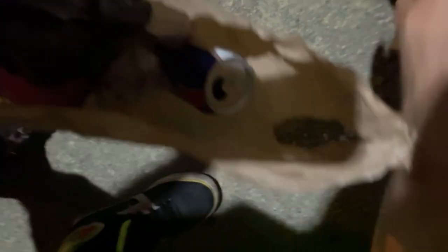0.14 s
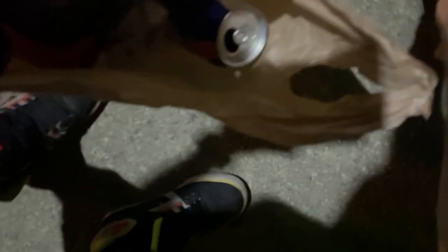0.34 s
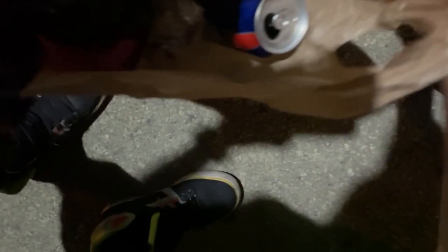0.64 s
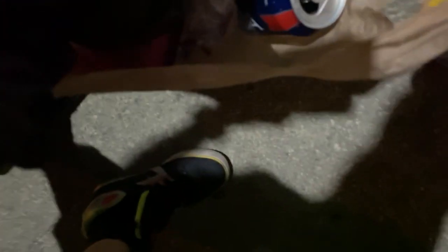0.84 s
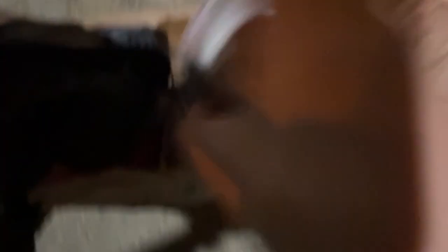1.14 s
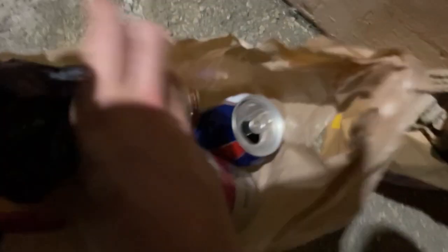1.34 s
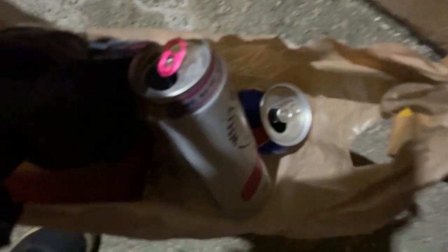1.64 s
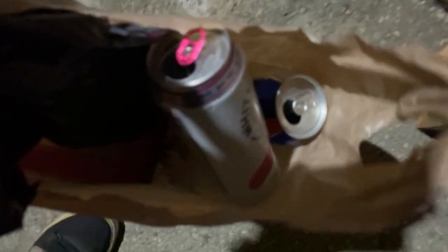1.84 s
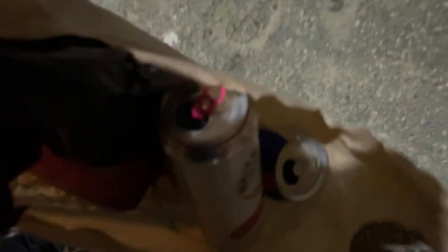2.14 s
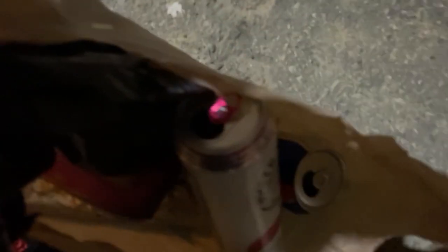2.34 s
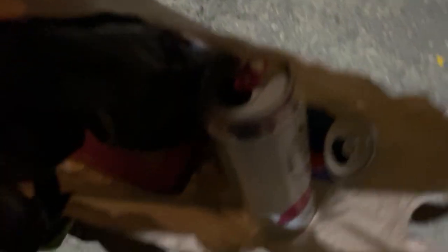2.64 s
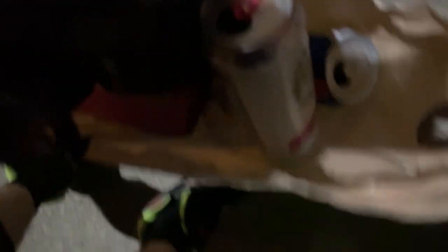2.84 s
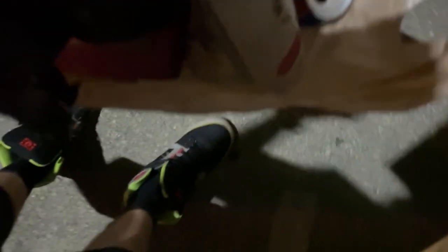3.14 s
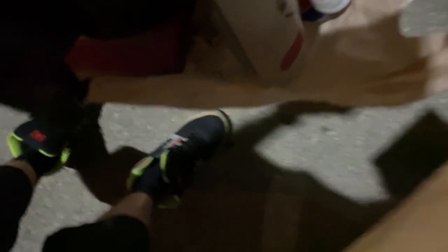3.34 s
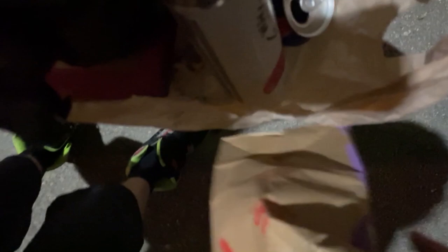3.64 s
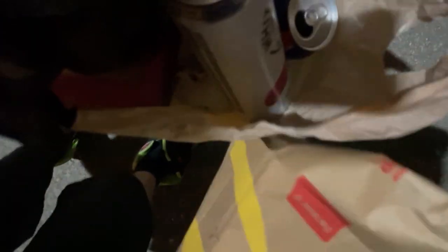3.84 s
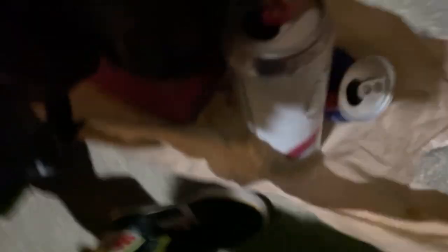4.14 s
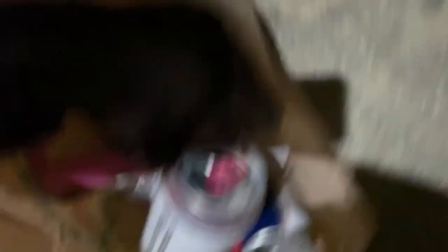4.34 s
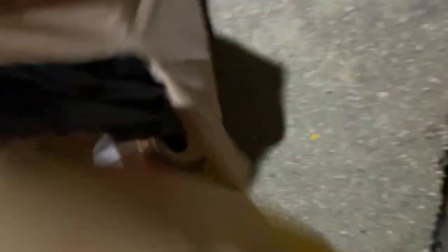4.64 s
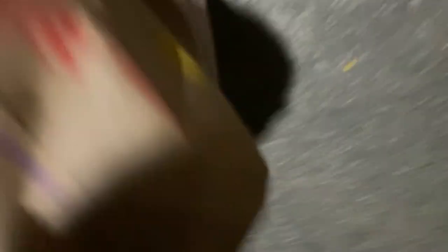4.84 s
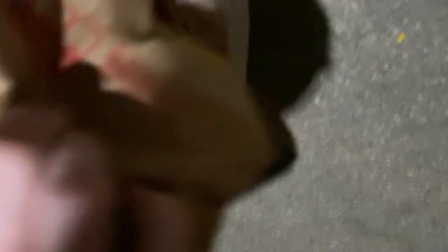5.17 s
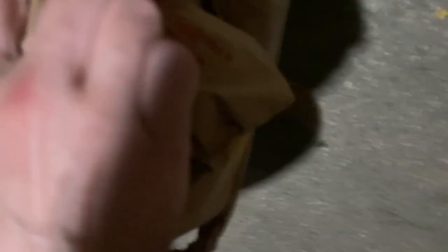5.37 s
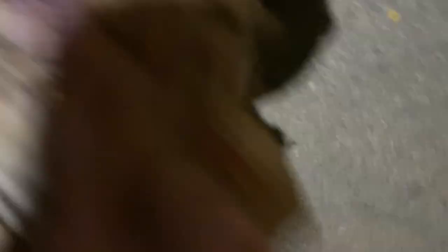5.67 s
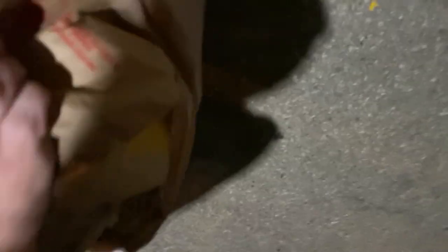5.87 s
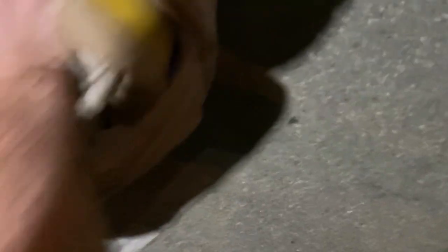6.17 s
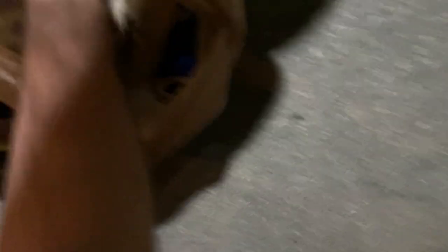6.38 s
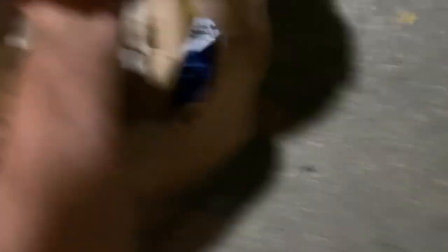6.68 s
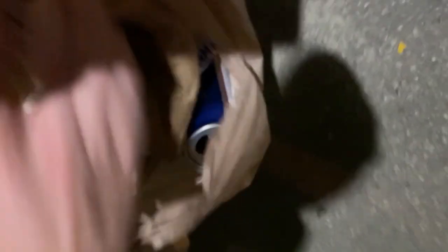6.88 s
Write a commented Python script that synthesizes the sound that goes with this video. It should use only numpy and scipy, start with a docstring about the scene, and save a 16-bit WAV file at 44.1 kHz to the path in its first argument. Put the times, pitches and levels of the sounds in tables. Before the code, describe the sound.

Empty drink cans clink in a paper bag outdoors, then the bag is swung and gathered up with loud crackling, over low wind rumble.

```python
"""Outdoors at night, a paper bag of empty drink cans held close to the microphone, for seven seconds.
One can taps another, ringing in decaying sines; a further can drops in, with a scratchy noise contact.
The grip shifts, the bag sags, sways and is swung round, its cans knocking as short hollow noise bursts.
Last it is gathered up: crackle from tiny random creases swells and stiff folds snap as noise bursts.
Throughout, a low rumble of wind and a wash of far traffic, both filtered noise, lie underneath."""
import sys
import numpy as np
from scipy import signal
from scipy.fft import rfft, irfft
from scipy.io import wavfile
from scipy.ndimage import uniform_filter1d

SR = 44100
rng = np.random.default_rng(int(sys.argv[2]) if len(sys.argv) > 2 else 0)


def unload_audio(sound):
    """Save the sound as a 16-bit wav file, at the path given as the first command line argument."""
    columns = np.transpose(np.atleast_2d(sound))
    # keep every value between -1 and 1, then stretch to whole-number steps
    steps = np.round(np.clip(columns, -1, 1) * 32767)
    wavfile.write(sys.argv[1], SR, steps.astype(np.int16))


N = 309141  # samples


def amp(db):
    """Decibels to gain."""
    return 10 ** (np.asarray(db) / 20)


def evened(x):
    """Scales to rms 1."""
    return x / np.sqrt(np.mean(x ** 2) + 1e-20)


def steadied(x, seconds):
    """Holds the running rms at 1, leaving faster detail alone."""
    window = max(3, int(seconds * SR))
    return x / np.sqrt(abs(uniform_filter1d(x ** 2, window)) + 1e-12)


def curve(rows, axis=1):
    """One column of a time table, interpolated at every sample."""
    rows = np.asarray(rows)
    return np.interp(np.arange(N) / SR, rows[:, 0], rows[:, axis])


def coloured(x, points):
    """Filters x by (frequency [Hz], level [dB]) points, falling away beyond both ends, to rms 1."""
    hz, db = np.transpose(points)
    f = np.fft.rfftfreq(len(x), 1 / SR) + 1  # the 1 Hz offset avoids log(0)
    gain = amp(np.interp(np.log(f), np.log(hz), db))
    ends = np.minimum(np.minimum(f / hz[0], hz[-1] / f), 1) ** 2
    return evened(irfft(rfft(x) * gain * ends, len(x)))


def add(mix, s, sound):
    """Mixes a sound in at s seconds, cut off at the end of the mix."""
    part = mix[max(0, round(s * SR)):][:len(sound)]
    part += sound[:len(part)]


def resonate(x, hz, width_hz):
    """A resonance whose centre may follow a curve: shift down to 0 Hz, smooth, shift back up."""
    turn = np.exp(2j * np.pi * np.cumsum(hz * np.ones(len(x))) / SR)
    r = np.exp(-np.pi * width_hz / SR)
    return 2 * (turn * signal.lfilter([1 - r], [1, -r], x / turn)).real


def burst(colour, t60, rise, grit_db=2.0, size=8192):
    """A crowd of overlapping modes, struck by a quick stutter of slips; the treble dies first."""
    t = np.arange(size) / SR
    slips = evened(uniform_filter1d(rng.standard_normal(size), size=30))
    stutter = amp(grit_db * slips.clip(-2, 2))
    noise = coloured(rng.standard_normal(size) * stutter, colour)
    low = signal.sosfilt(signal.butter(1, 3000, fs=SR, output="sos"), noise)
    high = noise - low
    fall, onset = amp(-60 * t / t60), 1 - np.exp(-t / rise)
    # both bands outlast the nominal t60, the low one longest
    sound = onset * (low * fall ** 0.69 + high * fall ** 0.89)
    # keep the energy of the plain envelope
    return sound * np.linalg.norm(onset * fall) / np.linalg.norm(sound)


# low rumble of wind and far traffic: (time [s], level [dB], centre of its boom [Hz])
RUMBLE_LEVELS = [(0, -23.5, 63), (.3, -31, 65.6), (.55, -25, 85.8), (1.15, -25, 74.4), (1.45, -35, 75),
                 (1.66, -23.5, 65.2), (2.25, -22.5, 59), (2.85, -28.5, 71.5), (3.02, -24, 80.7),
                 (4.1, -24, 73.4), (4.56, -30, 73), (4.74, -22.5, 65), (5.15, -28, 73.6), (5.5, -41, 72),
                 (5.72, -26.5, 80), (6.3, -32.5, 74), (6.65, -43.5, 77.4), (7, -37.5, 65.5)]
# spectrum of the rumble around the boom: (frequency [Hz], relative level [dB])
RUMBLE_SPECTRUM = [(24, -32), (31, -37), (40, 8.5), (58, 6), (108, 3.5), (155, -13), (210, -15.5),
                   (290, -25)]


def rumble():
    """Lumpy low noise with a boom of resonating noise whose centre wanders."""
    air = coloured(rng.standard_normal(N), RUMBLE_SPECTRUM)
    centre = curve(RUMBLE_LEVELS, axis=2)
    narrow = resonate(rng.standard_normal(N), centre, width_hz=9.9)
    boom = evened(resonate(narrow, centre, width_hz=23))
    return amp(curve(RUMBLE_LEVELS)) * steadied(boom + air, 0.1055)


# street heard from far off: (time [s], level [dB])
STREET_LEVELS = [(0, -48.5), (.65, -51.5), (1.55, -51.5), (1.85, -45.5), (2.65, -47), (3.35, -59),
                 (4.2, -50), (6.35, -50), (6.68, -63), (7, -47)]
# spectrum of the street: (frequency [Hz], relative level [dB])
STREET_SPECTRUM = [(190, 0), (520, -10), (860, -10.5), (1400, -19.5), (2200, -22), (3300, -31.5),
                   (5300, -27.5), (7000, -41), (15500, -61)]


def street():
    """Far traffic, blended by distance into a smooth wash of noise."""
    return coloured(rng.standard_normal(N), STREET_SPECTRUM) * amp(curve(STREET_LEVELS))


def surroundings(x):
    """Short scatter from the pavement and nearby walls, as a decaying noise echo."""
    tail = burst([(150, 5), (1000, -1.5), (5000, -1.0), (16000, -2.5)], t60=0.15, rise=0.0016)
    return signal.oaconvolve(x, tail / np.linalg.norm(tail))[:N]


# the whole bag bumping: (time [s], level [dB])
BAG_BUMPS = [(1.3253, -25.5), (2.521, -27.5), (4.2702, -25.5), (4.3028, -21.5), (4.487, -30), (4.611, -29),
             (4.8863, -23), (5.2234, -21), (5.2658, -30), (6.2867, -30)]
# spectrum of a bump: (frequency [Hz], relative level [dB])
BUMP_SPECTRUM = [(50, -76), (130, 12.5), (280, 11.5), (450, -11), (900, -14), (2500, -13)]


def bumps():
    """The bag itself thuds: dull bursts of noise with a soft onset."""
    out = np.zeros(N)
    for s, db in BAG_BUMPS:
        add(out, s, amp(db) * burst(BUMP_SPECTRUM, t60=0.11, rise=0.004))
    return out


# cans knocking, damped by the paper:
# (time [s], level before a 2 dB cut [dB], pitch [Hz], nominal t60 [s])
CAN_KNOCKS = [(1.3259, -20, 1160, 0.03), (1.326, -28, 646, 0.029), (3.179, -17, 1030, 0.017),
              (3.355, -26, 1040, 0.03), (3.575, -32.5, 1290, 0.1), (4.303, -25, 1010, 0.074),
              (4.4112, -16.5, 1220, 0.033), (4.445, -17.5, 1400, 0.092), (4.452, -32.5, 567, 0.27),
              (4.486, -24, 1770, 0.067), (5.813, -24, 1080, 0.17), (6.04, -23, 1090, 0.055),
              (6.825, -19, 700, 0.023)]


def knocks():
    """Cans pressed in paper only give a short hollow tock, a noise burst peaking at the pitch."""
    out = np.zeros(N)
    for s, db, hz, t60 in CAN_KNOCKS:
        hollow = [(hz / 6, -15), (hz * 0.56, -9), (hz, 0), (hz * 1.27, -3), (hz * 1.58, -17), (hz * 10, -37)]
        add(out, s, amp(db - 2.0) * burst(hollow, t60, rise=0.00035))
    return out


# cans striking: (time [s], ring level [dB], scratchy contact level [dB],
# can [0 = lying in the bag, 1 = dropped in; also scales the waver])
CAN_CLINKS = [(0.435, -47.5, -51, 0.12), (0.5651, -27.5, -36, 0.44), (0.5743, -35.5, -42, 0.39),
              (1.3253, -17.5, -23, 1), (1.3343, -30, -27.5, 1), (1.347, -37, -24, 1), (1.4047, -47, -26, 1),
              (1.4327, -41, -30, 0.9)]
# modes of the can lying in the bag: (frequency [Hz], level relative to the ring [dB], t60 [s])
LYING_CAN_MODES = [(281, -5, 0.17), (1105, -3, 0.12), (1320, -32.5, 0.95), (1670, -16, .09),
                   (2050, -4, 0.023), (3070, -12, 0.2), (3160, -12, 0.13), (3970, -14, 0.069),
                   (4080, -2.5, 0.064), (4270, -15, .06), (4340, -17, 0.11)]
# modes of the can dropped in: (frequency [Hz], level relative to the ring [dB], t60 [s])
DROPPED_CAN_MODES = [(262, -2, 0.12), (300, -8.5, 0.26), (1100, -1.5, 0.15), (1380, -33, 0.12),
                     (1410, -24, 0.13), (1530, -24, 0.27), (2240, -11, 0.069), (2440, -18, 0.097),
                     (2722, -23, 0.3), (2900, -20, 0.13), (3488, -23, 0.22), (4630, -26, 0.43),
                     (4740, -33, .07), (5600, -37, 0.15), (10260, -4.5, 0.054)]
# spectrum of the scratchy contact: (frequency [Hz], relative level [dB])
CONTACT_SPECTRUM = [(100, -12), (400, 3), (1500, 7), (3000, -6.5), (6000, -1.5), (11000, -7), (16000, -12)]


def clinks():
    """Thin aluminium: a scratchy contact, then the wall modes and the air inside the can ring."""
    out = np.zeros(N)
    t = np.arange(SR // 2) / SR
    onset = 1 - np.exp(-t / 0.00016)
    for s, ring_db, contact_db, can in CAN_CLINKS:
        modes = DROPPED_CAN_MODES if can > .5 else LYING_CAN_MODES
        for hz, db, t60 in modes:
            # a can rattling against its neighbours wavers in phase, most in the high modes
            waver = resonate(rng.standard_normal(len(t)), 0, 60) * can * hz / 400
            ring = amp(ring_db + db - 60 * t / t60) * np.sin(2 * np.pi * hz * t + waver)
            add(out, s, ring * onset)
        add(out, s, amp(contact_db) * burst(CONTACT_SPECTRUM, t60=0.048, rise=0.00041))
    return out


# pushes and pulls on the paper: (time [s], length before release [s], crackle level [dB],
# level of the flexing panels [dB], bright over dull crackle [dB])
# The bag is held open; from 1.3 s a can goes in and the hand draws back; from 2.2 s the grip shifts;
# from 2.7 s the bag sags and sways; from 4.25 s it is swung round, and from 4.75 s gathered up.
PAPER_STROKES = [(0.005, 0.041, -37.5, -48, 28), (0.077, 0.31, -60.5, -70, -9), (0.514, .22, -55, -75, 22),
                 (0.77, 0.51, -59.5, -62, -3), (1.023, 0.053, -50, -49.5, -8), (1.301, 0.17, -47, -49, 1),
                 (1.507, 0.13, -47, -54, 21), (2.212, 0.18, -48.5, -46.5, -4), (2.31, 0.26, -40.5, -44, 2),
                 (2.544, 0.15, -48.5, -48, -10), (2.709, 0.76, -62.5, -50, -22),
                 (3.496, 0.6, -60, -46.5, -26), (3.875, 0.048, -41.5, -35.5, -25),
                 (4.257, 0.064, -36, -29, -4), (4.346, .14, -39, -34.5, -2), (4.52, 0.24, -47, -49.5, -2),
                 (4.765, 0.29, -32.5, -34, 1), (5.053, 0.19, -39.5, -38.5, -4),
                 (5.177, 0.13, -31.5, -43, -9), (5.285, 0.17, -34.5, -38, -3), (5.525, 0.48, -40, -41, -8),
                 (5.622, 0.062, -28.5, -33.5, 10), (5.826, 0.22, -32, -37, -6.5),
                 (6.097, 0.22, -36.5, -39, -15), (6.338, 0.19, -45, -42.5, -22),
                 (6.734, 0.064, -54, -38, -25)]
STROKE_ATTACK_S, STROKE_RELEASE_T60_S = 0.029, 0.18
IDLE_CRACKLE_DB, IDLE_PANEL_DB, IDLE_BRIGHT_DB = -67.5, -63, 1  # the held bag is never quite still


def stroke_powers(crackle_db, panel_db, bright_db):
    """Powers of dull crackle, bright crackle and panels, the crackle shared out by its brightness."""
    bright_share = 1 / (1 + amp(-bright_db) ** 2)
    crackle = amp(crackle_db) ** 2
    return np.array([[crackle * (1 - bright_share)], [crackle * bright_share], [amp(panel_db) ** 2]])


def handling():
    """Each stroke swells, holds and dies away; gives gains of dull crackle, bright crackle, panels."""
    t = np.arange(N) / SR
    power = stroke_powers(IDLE_CRACKLE_DB, IDLE_PANEL_DB, IDLE_BRIGHT_DB)
    for start, length, crackle_db, panel_db, bright_db in PAPER_STROKES:
        attack = np.clip((t - start) / STROKE_ATTACK_S, 0, 1)
        release_time = np.clip((t - start - length) / STROKE_RELEASE_T60_S, 0, 2)
        release = np.exp(-np.log(1000) * release_time)
        power = power + stroke_powers(crackle_db, panel_db, bright_db) * (attack * release) ** 2
    return np.sqrt(power)


def creases(per_s, spread_db, t60, low_hz, high_hz, count=32, size=1024):
    """Countless tiny buckles of paper, each ringing its own small facet; a few are large."""
    t, out = np.arange(size) / SR, np.zeros(N)
    for hz in np.geomspace(low_hz, high_hz, count):
        fall = amp(-60 * t / (t60 * rng.uniform(1.0, 5.0)))
        facet = evened(resonate(rng.standard_normal(size), hz, 1.85 * hz)) * fall
        sizes = amp(spread_db * np.minimum(rng.exponential(1, N), 4))
        buckles = rng.random(N) < per_s / count / SR
        out += signal.oaconvolve(sizes * buckles, facet)[:N]
    return steadied(out, 0.055)


def folding(x, depth_db):
    """As the bag changes shape, its resonances come and go in random patches of time and frequency."""
    z = signal.stft(x, nperseg=512, noverlap=384)[2]
    patches = rng.standard_normal(z.shape)
    for _ in range(2):
        patches = uniform_filter1d(patches, size=4, axis=0)
        patches = uniform_filter1d(patches, size=8, axis=1)
    patched = z * amp(depth_db * evened(patches))
    return signal.istft(patched, nperseg=512, noverlap=384)[1][:N]


# filter on the fine crackle: (frequency [Hz], relative gain [dB])
CRACKLE_FILTER = [(1200, -7.5), (2400, -1.5), (3600, -2), (7400, -2.5), (12300, -0.5), (16000, -9)]
# filter on the flexing panels: (frequency [Hz], relative gain [dB])
PANEL_FILTER = [(150, 8), (250, 8), (400, 0), (600, 3.5), (1100, 0), (1700, -5), (2600, -11.5), (5000, -21)]


def rustle(dull_gain, bright_gain, panel_gain):
    """Fine crackle from the creases over the duller flexing of the bag's panels."""
    fine = creases(per_s=3000, spread_db=5.8, t60=.003, low_hz=1500, high_hz=15000)
    coarse = creases(per_s=800, spread_db=4, t60=.015, low_hz=250, high_hz=2500)
    # creases give way in clumps a few milliseconds long
    clumps = amp(1.3 * evened(uniform_filter1d(rng.standard_normal(N), size=200)))
    full = coloured(folding(fine * clumps, depth_db=2.5), CRACKLE_FILTER)
    treble = signal.sosfilt(signal.butter(1, 6000, "high", fs=SR, output="sos"), full)
    crackle = dull_gain * steadied(full - treble, 0.053) + bright_gain * steadied(treble, 0.098)
    tilted = np.diff(coarse, prepend=0) + .1 * coarse  # leans towards the treble
    flexing = folding(tilted * clumps, depth_db=3)
    return crackle + panel_gain * steadied(coloured(flexing, PANEL_FILTER), 0.08)


SNAP_T60_S, SNAP_DULL_DB_PER_DOUBLING = 0.028, 40.5  # duller folds are larger and ring longer


def snap(body_db, treble_db):
    """A stiff fold pops through; the hollow of the bag answers briefly."""
    body = [(130, body_db - 5), (350, body_db - 4.5), (700, body_db + .5)]
    top = [(1800, 0), (4000, 0), (7000, treble_db + 4.0), (12500, treble_db - .5), (16000, treble_db - 9)]
    t60 = SNAP_T60_S * 2 ** (-treble_db / SNAP_DULL_DB_PER_DOUBLING)
    return burst(body + top, t60, rise=0.00071)


# large folds snapping through: (time [s], level before a 1 dB cut [dB],
# tilt of the hollow body [dB], tilt of the treble [dB])
LARGE_SNAPS = [(0.792, -32, -8, -5), (0.884, -33, -16, 3), (1.2467, -32.5, 16, 5), (1.77, -34, 5, -14.5),
               (1.919, -41, -12, 8), (2.264, -30.5, -2, 0), (2.28, -24, 4, 2), (2.435, -24.5, -7, -7),
               (2.447, -20.5, -2, -1.5), (2.5197, -18, 4, -1), (2.5483, -23, 2, 3), (2.65, -28, -26, -6.5),
               (2.764, -37, -4, -16), (3.133, -24, 17, -15), (3.217, -31, 13, -18), (3.311, -24, 6, -14),
               (3.3958, -28, 18, -34), (3.456, -30.5, 9, -12), (3.632, -30.5, 1, -22), (3.7, -26, 8, -13),
               (3.751, -29, -5, -14), (3.7655, -23, 1, -7), (3.827, -28.5, 9, -13),
               (3.9528, -26.5, -5, -13), (3.9967, -24.5, 11, -18), (4.0766, -29.5, 9, -30),
               (4.1162, -29.5, 13, -18), (4.444, -17.5, -5, -5), (4.8843, -16.5, 8, -17),
               (5.1723, -17.5, 0, -10), (5.1933, -25, -7, -1), (5.2032, -18, 2, -23),
               (5.2194, -20, -8, -13), (5.242, -20.5, -18, -15), (5.2608, -13.5, -7, -18),
               (5.2677, -11.5, 27.5, 9.5), (5.2854, -28, 15, -17), (5.3548, -18.5, 1, -2),
               (5.606, -28, -6, -15), (5.6133, -19.5, -1, -13), (5.7022, -17.5, 3, -15),
               (6.04, -13.5, -5.5, -13), (6.064, -21, -18, 14), (6.099, -19, -3, -3.5),
               (6.122, -17.5, -3, -17), (6.2105, -18, 5, -20), (6.2275, -18, -29, -24),
               (6.2628, -14.5, -7, -11), (6.286, -12.5, 2.5, -6.5), (6.353, -25, -30, -7),
               (6.4533, -12.5, -3.5, -5), (6.493, -14.5, -34, -5.5), (6.4998, -20, -20, -10),
               (6.507, -23, -7, -16), (6.5272, -13.5, 4.5, -5), (6.5919, -14.5, -4, -7.5),
               (6.6316, -25.5, 7, -21), (6.701, -25, 3, -6.5), (6.765, -19, -2, -12.5),
               (6.7832, -19, 10, -13), (6.8081, -18, -4, -7), (6.8229, -12.5, 4.5, -4),
               (6.86, -26.5, 4, -17), (6.8946, -19, 2, -13), (6.9438, -15, -2.5, -11)]
SMALL_SNAPS_PER_S = 20
SMALL_SNAP_OVER_DB, SMALL_SNAP_SPREAD_DB = 3.5, 2.5  # level above the crackle around them, its spread


def snaps(crackle_gain):
    """The large folds, and small ones at random that grow with the crackle around them."""
    out = np.zeros(N)
    for s, db, body_db, treble_db in LARGE_SNAPS:
        add(out, s, amp(db - 1.0) * snap(body_db, treble_db))
    for at in np.flatnonzero(rng.random(N) < SMALL_SNAPS_PER_S / SR):
        strength, hollow, sharp = rng.standard_normal(3).clip(-2, 2)
        gain = crackle_gain[at] * amp(SMALL_SNAP_OVER_DB + SMALL_SNAP_SPREAD_DB * strength)
        add(out, at / SR, gain * snap(body_db=-23 + 2.3 * hollow, treble_db=-14 + 1.3 * sharp))
    return out


def scene():
    """The bag close by, its scatter from the surroundings, and the rumble and street behind."""
    dull, bright, panel = handling()
    paper = rustle(dull, bright, panel) + snaps(np.hypot(dull, bright))
    bag = paper + clinks() + knocks() + bumps()
    return (bag + amp(-15) * surroundings(bag) + rumble() + street())[None]


def record(dry):
    """The highest peaks are rounded off towards 0.34; then the treble is cut at 15850 Hz."""
    rounded = dry / (1 + (dry / .34) ** 4) ** .25
    band_limit = signal.firwin(511, 15850, window=("kaiser", 9), fs=SR)
    return signal.oaconvolve(rounded, band_limit[None], "same")


dry = scene()
out = record(dry)
unload_audio(out)
```